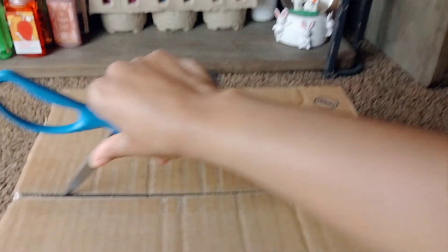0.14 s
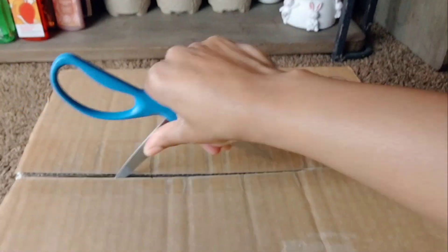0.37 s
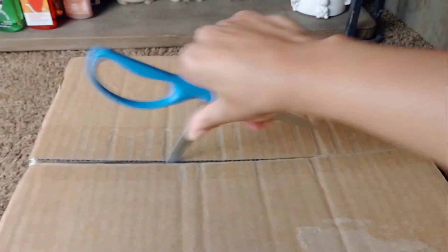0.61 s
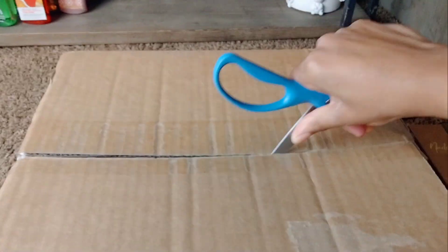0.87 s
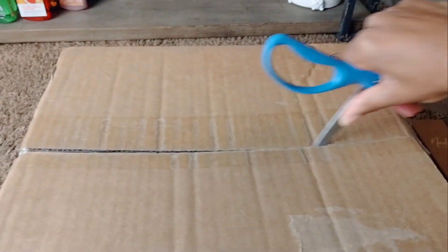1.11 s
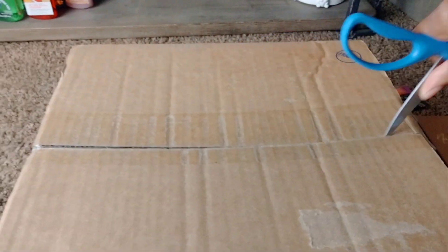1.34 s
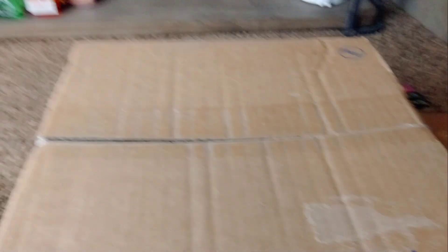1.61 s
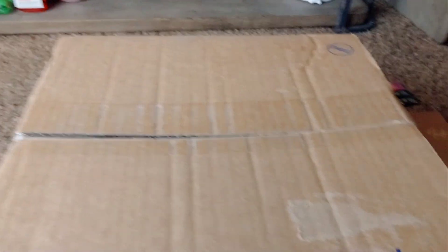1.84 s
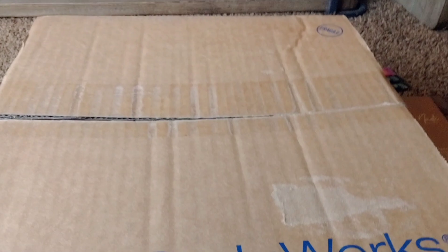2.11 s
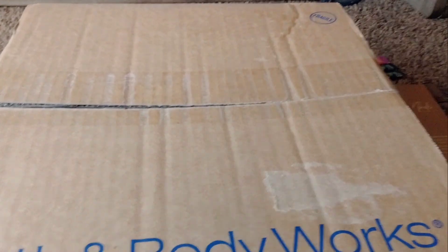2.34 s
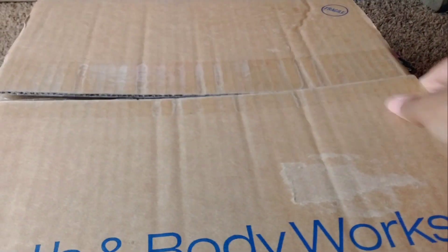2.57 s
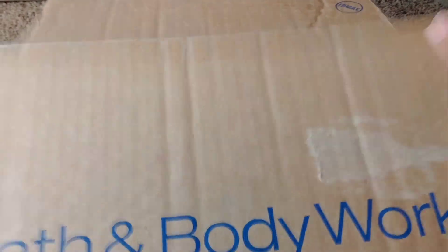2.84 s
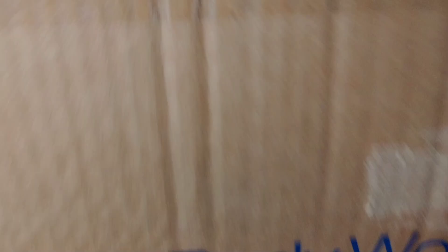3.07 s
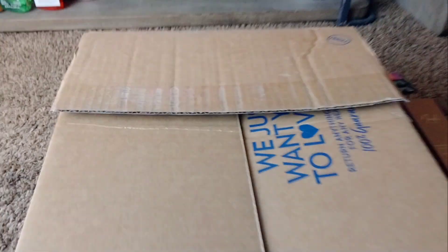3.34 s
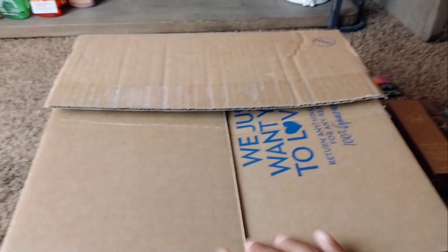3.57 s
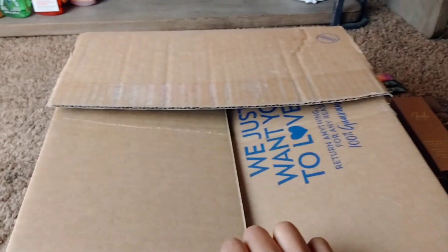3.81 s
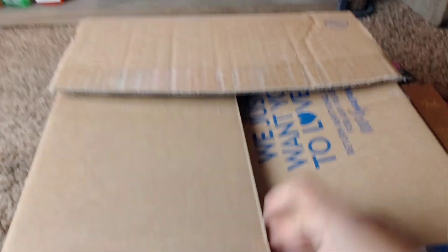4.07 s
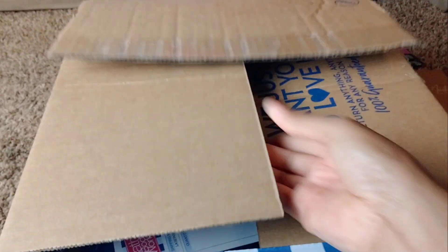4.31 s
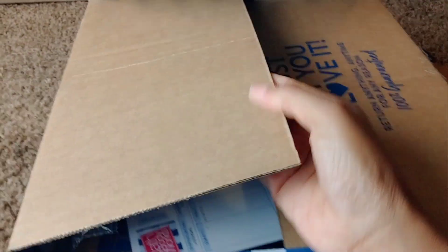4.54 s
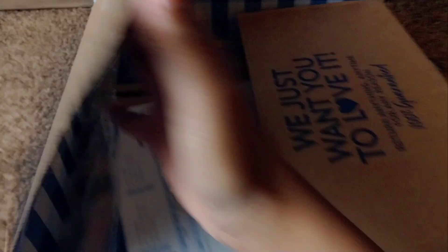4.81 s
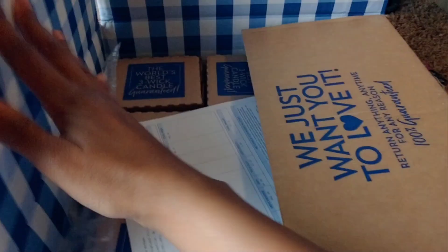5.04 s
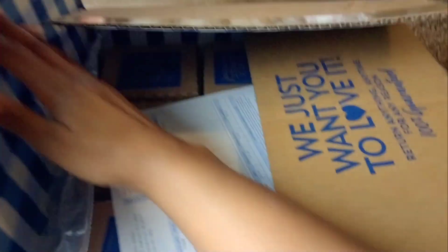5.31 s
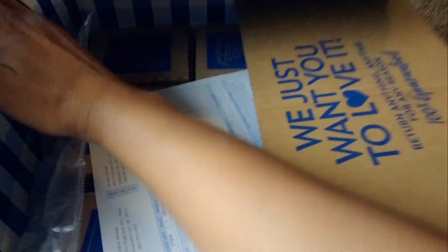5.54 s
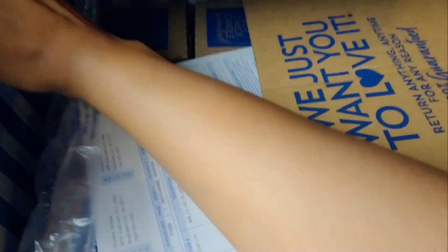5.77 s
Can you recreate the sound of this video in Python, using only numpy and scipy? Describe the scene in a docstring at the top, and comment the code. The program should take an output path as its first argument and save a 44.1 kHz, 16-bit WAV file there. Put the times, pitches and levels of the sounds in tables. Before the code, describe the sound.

Close, dry stereo sound in a small quiet room with faint low rumble and slight hiss. From 0 s a blade rasps on hollow cardboard, dips quieter around 0.2-0.3 s, then catches in a rapid stutter from 0.35 to 0.65 s, peaking in a heavy drum-like thump with a woody snap near 0.58 s. A fuller gritty drag runs from 0.7 to 1.3 s, ending in a stiff snap at about 1.27 s. Near silence follows, with tiny ticks around 1.9 s. A dull knock comes at 2.25 s, then loud clustered pops and booms at 2.6-2.7 s, soft rubbing, and another hollow knock at 3.18 s. Light taps and brushes continue from 3.35 to 4.2 s. At 4.4-4.8 s a flap scrapes up brightly and hissily, with a knock at 4.55 s and a crisp crack at 4.85 s. Afterwards come quiet rubs, soft bumps near 5.5 s, and small crackles from 5.77 s, ending with a brief rustle.

```python
"""A scissor blade is dragged along the taped seam of a cardboard box on a carpet, catching and slipping; then a
hand lifts the flaps, which pop, knock and rub. The box booms like a dull drum in a quiet small room.
Rubbing is noise and tiny slips driven through box resonances; knocks, taps, snaps and low swells are short tones.
Random echoes add near surfaces and room; two unlike microphone ports each add their own treble resonance."""
import sys
import numpy as np
from scipy import signal
from scipy.fft import rfft, irfft, next_fast_len
from scipy.io import wavfile
from scipy.ndimage import uniform_filter1d, map_coordinates

SR = 44100
rng = np.random.default_rng(int(sys.argv[2]) if len(sys.argv) > 2 else 0)


def inscribe(sig):
    """Save sig as 16-bit PCM at rate SR to the path in sys.argv[1].

    A 1-D sig is mono; a 2-D sig holds one channel per row.
    Samples are clipped to [-1, 1] before scaling.
    """
    pcm = np.round(np.clip(np.atleast_2d(sig).T, -1, 1) * 32767)
    wavfile.write(sys.argv[1], SR, pcm.astype(np.int16))


def gain_from_db(level_db):
    """Convert decibel levels to linear amplitude factors (20 dB per decade)."""
    decades = np.asarray(level_db, float) / 20
    return 10 ** decades


N = 260631

# hollow modes of the box: mode_hz, level_db, t60_s
HOLLOW = [(83.3, -3, 0.17), (119.2, -0.5, 0.13), (152.7, -1.5, 0.14), (198.1, -2, 0.08), (237, 0.5, 0.083),
          (270.3, -0.5, 0.07), (300.4, -2.5, 0.087), (355, -3.5, 0.08), (446, -11.5, 0.042)]
# panel resonances of the board: centre_hz, width_hz, level_db
PANEL = [(493, 78, -0.5), (669, 53, 1.5), (780, 72, 5), (961, 714, -4.5)]
# stiffer resonances of the cut edges: centre_hz, width_hz, level_db
EDGE = [(1530, 192, 1), (2406, 670, -2.5), (3540, 550, -5), (4800, 2300, -7)]
# microphone port responses: freq_hz, left_db, right_db
PORTS = [(29.6, -6.5, -9), (68.5, 1, -1), (310, 1.5, 1.06), (1500, 1, -3), (3200, 4, 0.5),
         (5260, -1.5, -0.5), (6280, -3.5, 5.5), (7480, 15, -4), (8100, 13, -9), (9180, -4, -14.5),
         (10500, -5.5, -17), (13100, -11, -9.5), (16000, -4, -9)]


def unit(x):
    """Scale to rms 1."""
    return x / np.sqrt(np.mean(np.abs(x) ** 2) + 1e-20)


def along(points, hz):
    """Every column after the frequency, read on a log axis."""
    f, *cols = np.transpose(points)
    return np.array([np.interp(np.log(hz + 1), np.log(f + 1), c) for c in cols])


def filtered(x, response):
    """x times a complex response of frequency."""
    m = next_fast_len(N + SR // 2)
    return irfft(rfft(x, m) * response(np.fft.rfftfreq(m, 1 / SR)), m)[..., :N]


def pair():
    """Left and right noise, alike in the bass and less so in the treble."""
    # left-right correlation: freq_hz, correlation (0-1)
    alike = [(60, 1), (150, 0.9), (300, 0.98), (800, 0.76), (2000, 0.47), (8000, 0.38), (14000, 0.6)]

    def mix(hz):
        angle = np.arccos(np.clip(along(alike, hz)[0], 0, 1)) / 2
        return [np.cos(angle), np.sin(angle)]

    a, b = filtered(rng.standard_normal((2, N)), mix)
    return np.array([a + b, a - b])


def resonances(modes):
    """Causal sum of resonances, falling steeply above the last one, with mean power gain 1."""
    def response(f):
        body = 0
        for k, (centre_hz, width_hz, db) in enumerate(modes):
            damped = 1j * f * width_hz
            body = body + (-1) ** k * gain_from_db(db) * damped / (centre_hz ** 2 - f * f + damped)
        return unit(body / (1 + 1j * f / (1.7 * modes[-1][0])) ** 2)

    return response


def fibres(hz):
    """Hiss colour of torn and rubbed surface fibres, mean power gain 1."""
    # hiss density: freq_hz, level_db (per Hz)
    fibre = [(3000, -9), (4800, -3.5), (6000, -3), (9000, -3), (12000, -4), (16000, -9.5)]
    return unit(gain_from_db(along(fibre, hz)[0]))


def contact(slide_db, weight_db):
    """Force on the hollow, panels, cut edges and fibres: a heavier touch reaches deeper."""
    # dB over the slide, share of the weight taken
    boom, rasp, scrape = (5.4, 0.73), (0, 0.81), (-2.5, 0.58)
    parts_db = [slide_db + db + share * weight_db for db, share in (boom, rasp, scrape)]
    return gain_from_db(np.array(parts_db + [slide_db]))


def stroke(rows):
    """Force of a sliding contact, practically silent outside its own time."""
    t = np.arange(N) / SR
    s, slide_db, weight_db = np.transpose(rows)
    rest_db = -97
    return contact(np.interp(t, s, slide_db, rest_db, rest_db), np.interp(t, s, weight_db))


def grain(rate_hz, depth_db):
    """Quick random unevenness of the contact, rms 1."""
    knots = rng.standard_normal(int(N * rate_hz / SR) + 4)
    return unit(gain_from_db(depth_db * map_coordinates(knots, [np.arange(N) * rate_hz / SR])))


def patchy(x, patchy_db):
    """The colour drifts in patches as the contact wanders over uneven board."""
    z = signal.stft(x, nperseg=512)[2]
    field = rng.standard_normal(z.shape[1:])
    for axis in (0, 1):
        field = uniform_filter1d(field, size=10, axis=axis)
    return signal.istft(z * unit(gain_from_db(patchy_db * unit(field))), nperseg=512)[1][:, :N]


def gliding(x, rows, half_widths_octaves):
    """Two resonances glide in pitch and strength."""
    hz, t, z = signal.stft(x, SR, nperseg=512)
    s, *cols = np.transpose(rows)
    low_hz, low_db, high_hz, high_db = (np.interp(t, s, c) for c in cols)

    def bump(centre_hz, octaves):
        return np.exp(-.5 * (np.log2((hz[:, None] + 1) / centre_hz) / octaves) ** 2)

    low_width, high_width = half_widths_octaves
    lift_db = low_db * bump(low_hz, low_width) + high_db * bump(high_hz, high_width)
    return signal.istft(z * gain_from_db(lift_db), SR, nperseg=512)[1][:, :N]


def blade_pull():
    """Blade sliding along the seam: drives the hollow a little less and the edges a little more than a hand."""
    # pull along the seam: time_s, slide_db, weight_db (how much more the board shakes than the fibres hiss)
    pull = [(0, -42.5, 8), (.1, -37.5, 3.5), (.145, -38.5, 8), (.17, -49.5, 8.5), (.25, -54.5, 9),
            (.33, -52.5, 7), (.4, -47, 8.5), (.56, -41, -1.5), (.67, -42.5, 3), (.7, -41.5, 3),
            (.768, -42.5, 10), (.776, -37.5, 7), (.9, -38, 7), (.968, -37.5, 9.5), (.98, -42.5, 8.5),
            (.995, -37, 9.5), (1.06, -36, 7.5), (1.2, -36.5, 0.5), (1.27, -36, 5.5), (1.31, -50.5, 7),
            (1.4, -65, 0.5)]
    boom_db, scrape_db = -0.5, 0.5
    return stroke(pull) * gain_from_db([[boom_db], [0], [scrape_db], [0]])


def slips():
    """Sparse tiny stick-slip releases at random moments, rms 1."""
    rate_hz, spread_db = 600, 18
    when, size = rng.random(N), rng.random(N)
    return unit((when < rate_hz / SR) * gain_from_db(spread_db * size))


def friction():
    """Rubbing, slips and catches shake the hollow, the panels, the cut edges and the surface fibres."""
    # lid pressed flat by the blade: freq_hz, gain_db
    blade = [(70, -10.5), (130, -7), (250, -2.5), (500, -1), (1000, -3.5), (1600, -2), (4000, -2),
             (6500, -2.5)]
    # lid resonances shifted by the opening slit: time_s, low_hz, low_lift_db, high_hz, high_lift_db
    slit = [(0, 660, 12, 1500, 1), (0.15, 700, 11, 1500, 6), (0.34, 740, 8.5, 1700, -1.5),
            (0.43, 860, 6.5, 1650, 1), (0.52, 940, 15.5, 1720, 1), (0.6, 684, -1, 1520, 3),
            (0.68, 500, 9, 1500, 12), (0.77, 734, -1.5, 1560, 3), (0.87, 516, 6.5, 1490, 11),
            (0.96, 700, 2, 1550, 14.5), (1.06, 760, 4.5, 1530, 6.5), (1.2, 800, 5, 1600, 3),
            (1.3, 690, 3.5, 1730, 5.5)]
    # drifting low and high colour of the rubbing under the hand, strongest while the flap lifts:
    # time_s, low_hz, low_lift_db, high_hz, high_lift_db
    hand_colour = [(4.3, 900, 4.5, 4940, -3), (4.4, 1170, 8, 4800, 3), (4.48, 1700, -1, 4600, 8.5),
                   (4.53, 920, 10, 5700, -7), (4.6, 900, 4, 6100, 2.5), (4.69, 1580, -14, 5750, 7),
                   (4.75, 910, 9.5, 5000, 10.5), (4.82, 836, 10, 5200, 2.5), (5.0, 1010, -1, 5000, -3.5),
                   (5.4, 1090, 8.5, 4800, 2.5), (5.7, 970, 0.5, 5000, -0.5)]
    blade_off_s = 1.45
    t = np.arange(N) / SR
    uneven = [grain(50, 0.42), grain(70, 1.1), grain(80, 3.2), grain(170, 1.8)]
    force = (blade_pull() + flap_lift() + hand_slide()) * uneven + catches()

    hollow = resonances([(hz, np.log(1000) / np.pi / t60, db) for hz, db, t60 in HOLLOW])
    shapes = [hollow, resonances(PANEL), resonances(EDGE), fibres]
    stick = slips()
    reach = gain_from_db([-9.0, -2, -2.5, -12.5])  # slips against rubbing noise, in each part
    rubbed = np.zeros((2, N))
    for f, r, shape in zip(force, reach, shapes):
        rubbing = patchy(pair(), patchy_db=2.0) + r * stick
        rubbed += filtered(f * rubbing / np.hypot(1, r), shape)

    pressed = filtered(rubbed, lambda hz: gain_from_db(along(blade, hz)))
    under_blade = gliding(pressed, slit, (0.24, 0.144))
    under_hand = gliding(rubbed, hand_colour, (0.16, 0.19))
    return np.where(t < blade_off_s, under_blade, under_hand)


def echoes(x, table, count):
    """Decaying random reflections, one set per channel, redrawn for each of count equal stretches."""
    out, step = np.zeros((2, N + SR)), N // count + 1
    for at in range(0, N, step):
        hz, t, z = signal.stft(rng.standard_normal((2, SR // 3)), SR, nperseg=128)
        t60, db = along(table, hz)[:, :, None]
        fade = gain_from_db(-60 * t / t60)
        level = gain_from_db(db) / np.sqrt((fade ** 2).sum(1, keepdims=True) * 64)
        tail = signal.istft(z * fade * level, SR, nperseg=128)[1]
        piece = signal.fftconvolve(x[:, at:at + step], tail, axes=1)
        out[:, at:at + piece.shape[1]] += piece
    return out[:, :N]


def near_echoes(x):
    """Short scatter off box, hand and floor."""
    # decay: freq_hz, t60_s, level_db
    near = [(200, 0.04, -16.5), (798, 0.0055, -6), (1970, 0.015, -3), (8050, 0.0037, -2.5),
            (13000, 0.011, -5)]
    return echoes(x, near, count=36)


def room_echoes(x):
    """Longer reflections of the small room."""
    # decay: freq_hz, t60_s, level_db
    room = [(100, 0.48, -27.5), (503, 0.079, -10), (3120, 0.13, -7.5), (11700, 0.15, -6)]
    return echoes(x, room, count=20)


def air():
    """The quiet room's steady rumble and hiss: shaped noise, less the louder port's gain."""
    # air spectrum: freq_hz, level_db (per Hz)
    spectrum = [(15, -72), (25, -20), (157, -5), (195, -3), (236, -8), (354, -11), (405, -20), (695, -22.5),
                (1040, -35), (1400, -34), (16000, -49.5)]
    noise = filtered(pair(), lambda hz: gain_from_db(along(spectrum, hz)[0] - along(PORTS, hz).max(0)))
    return gain_from_db(-52.5) * unit(noise)


def catches():
    """Force of short catches of blade, hand and flap edge: tension builds, then lets go quickly."""
    # catches, strongest 4 ms after time_s: time_s, slide_db, weight_db, length_ms
    rows = [(0.136, -31, -27, 6.4), (0.2104, -35, 8.5, 14.4), (0.257, -46.5, 6, 5.5), (0.269, -43.5, 7, 21),
            (0.298, -41.5, 7, 8), (0.306, -53, 13, 8), (0.34, -37.5, 11, 10.6), (0.368, -35.5, 10.5, 12),
            (0.389, -37.5, 14, 17), (0.408, -36.5, 16, 19), (0.428, -34.5, 17, 13), (0.451, -32, 7, 20),
            (0.472, -36, 8, 13), (0.492, -30.5, 4.5, 22), (0.511, -30, 5, 9.7), (0.531, -25, -2, 16.4),
            (0.555, -29, 5.5, 13), (0.58, -24, 0, 16.4), (0.608, -33.5, 2, 9), (0.619, -32.5, 4, 15),
            (0.6393, -36, 3, 19), (0.658, -27.5, -3, 11), (0.667, -39, 9, 16), (0.709, -30.5, -2.5, 8.3),
            (0.87, -38.5, 7, 71), (0.911, -39, 3, 14), (0.936, -43, 11.5, 33), (1.267, -28, 2.5, 13),
            (1.587, -56.5, -18, 7.6), (1.877, -59, -4, 17), (1.9, -60, -7, 14), (1.9127, -46, -19, 21),
            (1.929, -35.5, -24, 10.6), (2.034, -49, -39, 37), (2.3167, -42.5, -8, 5.5), (2.345, -43, 0, 27),
            (2.36, -42, 11.5, 4.6), (2.378, -58.5, 28, 11), (2.479, -52.5, 0.5, 30), (2.678, -46, 3, 9.3),
            (3.04, -47.5, 11.5, 18), (3.279, -45.5, 6, 6.8), (3.355, -34.5, -9, 14), (3.443, -43, -7, 17),
            (3.6157, -44.5, -4, 18), (3.816, -32.5, -5, 21), (4.268, -44, -17, 38), (4.367, -60, 12, 23),
            (4.587, -35, 0, 7.8), (4.8104, -39, -16, 2.8), (5.334, -45, -10, 37), (5.3532, -36.5, -8, 21),
            (5.58, -52, -7, 7.8), (5.634, -44.5, -17, 16), (5.749, -47, -24, 5.5), (5.807, -55, 15, 21),
            (5.825, -49, 12, 5.7), (5.8537, -54, 23.5, 12.4), (5.864, -50.5, 20, 4), (5.891, -37, -10, 22)]
    boom_db = 0.5
    t = np.arange(N) / SR
    force = np.zeros((4, N))
    for s, slide_db, weight_db, ms in rows:
        late = (t - s - .004) * 2500 / max(ms, 1)
        swell = np.exp(-(late * np.where(late > 0, 1.5, .85)) ** 2)
        force += contact(slide_db, weight_db)[:, None] * gain_from_db([[boom_db], [0], [0], [0]]) * swell
    return force


def taps_and_snaps():
    """Dull woody panel taps, stiff snaps and bright cracks: one pitch, weaker near its double, and crackle."""
    # short pitched sounds: start_s, level_db, pitch_hz, t60_s
    rows = [(0.3415, -20, 825, 0.025), (0.586, 2, 760, 0.008), (1.2328, -28, 1670, 0.04),
            (1.26, -22, 1725, 0.034), (1.2672, -6, 1700, 0.02), (1.2735, -15.5, 1950, 0.012),
            (2.252, -22.5, 735, 0.044), (2.61, -16, 593, 0.1), (2.617, -8, 1555, 0.012),
            (2.6586, -13, 7960, 0.017), (2.66, -9.5, 930, 0.014), (3.043, -28.5, 946, 0.032),
            (3.1814, -6.5, 650, 0.0096), (3.282, -30.5, 606, 0.032), (3.356, -30.5, 770, 0.057),
            (3.469, -28, 864, 0.072), (3.354, -30, 2180, 0.04), (3.818, -35, 1064, 0.039),
            (3.844, -42, 1500, 0.034), (3.845, -31, 880, 0.05), (3.9385, -23.5, 733, 0.019),
            (4.099, -24.5, 770, 0.016), (4.5535, -17, 805, 0.048), (4.588, -15, 5460, 0.023),
            (4.8498, -6, 943, 0.024), (4.849, -13, 5260, 0.024), (4.857, -16.5, 768, 0.029),
            (4.173, -31.5, 600, 0.016), (5.017, -22.5, 770, 0.024), (5.187, -34, 1500, 0.0086),
            (5.519, -29, 520, 0.034), (5.7687, -34, 4700, 0.012), (5.778, -26, 2000, 0.012),
            (5.805, -21, 2110, 0.014), (5.8047, -26, 4000, 0.014), (5.8262, -24, 2700, 0.02),
            (5.828, -28, 4030, 0.011), (5.85, -26, 1760, 0.013), (5.8543, -24.5, 2360, 0.012),
            (5.865, -27, 2300, 0.012)]
    crack_db, crack_db_per_octave = -6.5, 7.5  # low ones are dull and woody, high ones crackle
    out, t = np.zeros(N + SR), np.arange(SR // 10) / SR
    for s, db, hz, t60 in rows:
        ring = np.sin(2 * np.pi * hz * t) + gain_from_db(-17.0) * np.sin(2 * np.pi * 2.1 * hz * t)
        dry_crackle = unit(uniform_filter1d(rng.standard_normal(len(t)), size=5))
        ring += gain_from_db(crack_db + crack_db_per_octave * min(np.log2(hz / 1800), 0)) * dry_crackle
        envelope = gain_from_db(db - 60 * t / t60) * (1 - np.exp(-t / 0.00068))
        out[round(s * SR):][:len(t)] += envelope * ring
    return out[:N]


def knocks():
    """Each blow rings the hollow modes near the struck spot's pitch, slaps the panels and cracks the paper."""
    # sudden blows: start_s, boom_db, spot_hz (favoured pitch), panel_db and crack_db (relative to boom)
    rows = [(0.538, -13, 400, -15, -14.5), (0.558, -10.5, 372, -24, -25), (0.585, -5, 253.6, -9, -25.5),
            (1.277, -24.5, 293, -4, 0), (1.852, -28, 148, -39, -26.5), (2.251, -19.5, 175.6, -12.5, -9),
            (2.609, -7.5, 231, -5, -5), (2.618, -8.5, 136.2, -23, -37), (2.658, -10, 212, -8.5, -1),
            (2.673, -11, 237, -35, -30), (3.181, -11, 253.4, -21, -13.5), (3.196, -22.5, 355, -8, -7),
            (3.399, -25, 246, -9.5, -20), (3.47, -15, 306, -10.5, -24), (3.52, -34, 129, -11, -26),
            (3.6, -29.5, 287, -26, -21), (3.754, -34, 390, -3.5, -10), (3.94, -22, 310, -16.5, -24),
            (4.066, -30.5, 254, -35.5, -31), (4.101, -26.5, 212, -12, -8.5), (4.553, -14, 131, -1.5, -18.5),
            (4.848, -19, 175.5, 5, 2.5), (4.857, -16, 251.2, -37, -17), (4.889, -28, 114, -24, -30),
            (5.518, -32.5, 186, -18, -42), (5.556, -26.5, 145, -18, -7)]
    damping = 1.455  # a hand rests on the board and divides ring times by this
    spread_db, push_db = 3, 16.5  # random mode level; first push on the panels, over their slap
    t = np.arange(SR // 3) / SR
    boom, slap, crack = np.zeros((3, N + SR))
    push = np.zeros(N)
    hz, level_db, t60 = np.transpose(HOLLOW)[:, :, None]
    luck = rng.standard_normal((len(rows), len(HOLLOW), 1))
    for (s, db, spot_hz, panel_db, crack_db), chance in zip(rows, luck):
        share_db = level_db - 16 * np.abs(np.log2(hz / spot_hz)) + spread_db * chance
        bent_hz = hz * (spot_hz / hz[np.argmin(np.abs(hz - spot_hz))])  # a held flap bends the modes
        modes = gain_from_db(share_db - 60 * t * damping / t60) * np.sin(2 * np.pi * bent_hz * t)
        ring = modes.sum(0) * (1 - np.exp(-t / 0.0054))
        at = round(s * SR)
        span = slice(at, at + len(t))
        push[at] = gain_from_db(db + panel_db + push_db)
        boom[span] += gain_from_db(db) * ring / np.abs(ring).max()
        slap[span] += gain_from_db(db + panel_db + 2.0 - 60 * t * damping / 0.062)
        # glue or fibre tears for a moment, then stops
        tear = gain_from_db(db + crack_db - 7.0 - 7.6 * (t / 0.0042) ** 2)
        crack[span] += tear * (1 - np.exp(-t / 0.00012))
    slap, crack = slap[:N], crack[:N]
    board = filtered(slap * pair(), resonances(PANEL))
    board += gain_from_db(-11.0) * filtered(slap * pair(), resonances(EDGE))
    paper = filtered(crack * pair(), fibres)
    paper += gain_from_db(-7.0) * filtered(crack * pair(), resonances(EDGE))
    return boom[:N] + filtered(push, resonances(PANEL)) + board + paper


def low_swells():
    """Low swelling tones, each a half-sine arch: soft presses, and the slow swell or ringing tail of some knocks."""
    # swelling tones: start_s, level_db, pitch_hz, length_ms
    rows = [(1.923, -20, 162, 13.8), (2.607, 0, 278, 12.2), (2.629, -15.5, 217, 27), (2.662, -19, 201, 15),
            (2.6937, -25, 237, 42), (3.188, -16.5, 255, 7), (4.171, -22, 242, 16.2),
            (4.594, -16.5, 227, 16), (5.014, -17.5, 255.3, 30), (5.52, -23, 245, 7.6)]
    t = np.arange(N) / SR
    out = np.zeros(N)
    for s, db, hz, ms in rows:
        arch = np.sin(np.pi * np.clip((t - s) * 1000 / ms, 0, 1))
        out += gain_from_db(db) * arch * np.sin(2 * np.pi * hz * (t - s))
    return out


def hand_slide():
    """Force of the hand and flaps sliding on the board."""
    # slide: time_s, slide_db, weight_db
    hand = [(2.23, -75, 0.5), (2.27, -51.5, -0.5), (2.39, -53.5, 0.5), (2.43, -57, -3), (2.55, -56, -6.5),
            (2.61, -46, -1), (2.72, -47, -0.5), (2.8, -42, -8), (2.85, -45.5, -8.5), (2.86, -45, -17.5),
            (2.92, -44, -6), (2.94, -48, -11), (3.07, -54, -11), (3.174, -46, -14), (3.186, -35.5, -9),
            (3.24, -41, -6), (3.33, -45.5, -23), (3.5, -47.5, 5), (3.58, -55.5, -2), (3.67, -57.5, 3.5),
            (3.73, -64, 2), (3.78, -44.5, -9), (3.87, -48.5, 0), (3.92, -53.5, -7), (3.97, -46.5, -5),
            (4.14, -48, -4.5), (4.22, -52, -3), (4.4, -53.5, -1.5), (4.8, -43, -8), (4.9, -49.5, -1),
            (5.0, -53, -9.5), (5.15, -54.5, -3.5), (5.23, -48, -3.5), (5.41, -55, -6.5), (5.5, -46, -8.5),
            (5.6, -55, 0.5), (5.76, -55, 5), (5.86, -68, 28), (5.91, -38.5, -11.5)]
    return stroke(hand)


def flap_lift():
    """A flap dragged up past its neighbour: cut edges meet, so less hollow and more edge than under the hand."""
    # edge on edge: time_s, slide_db, weight_db
    lift = [(4.33, -80, 26), (4.41, -50.5, 8.5), (4.45, -36, -9), (4.525, -29.5, -12.5), (4.54, -50.5, -4),
            (4.58, -33.5, -14), (4.66, -41, -29), (4.76, -40.5, -25), (4.79, -58, 4), (4.83, -77, -16)]
    boom_db, scrape_db = -11.5, 9.5
    return stroke(lift) * gain_from_db([[boom_db], [0], [scrape_db], [0]])


def scene():
    """The box, its reflections and the room air."""
    box = friction() + knocks() + low_swells() + taps_and_snaps()
    return gain_from_db(-2.0) * (box + near_echoes(box) + room_echoes(box)) + air()


def top_cut(x):
    """Nothing passes above the cut-off."""
    return signal.sosfilt(signal.butter(12, 16610, fs=SR, output="sos"), x)


def record(dry):
    """Each port colours the sound, the left hearing the box ahead of the right; peaks are softly clipped."""
    # left over right: freq_hz, phase_lead_rad
    lead = [(300, 0), (600, .55), (1200, 1.17), (2400, 1.7), (5000, 1.21), (11000, 0)]
    top_hz, ceiling = 15930, .97

    def ports(hz):
        phase = np.exp(.5j * along(lead, hz) * [[1], [-1]])
        return gain_from_db(along(PORTS, hz)) * phase * (hz < top_hz)

    x = filtered(dry, ports)
    x = x / (1 + np.abs(x / ceiling) ** 8) ** (1 / 8)
    return top_cut(x)


dry = scene()
out = record(dry)
inscribe(out)
```